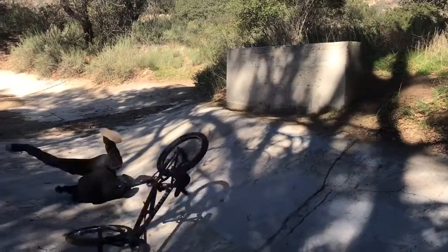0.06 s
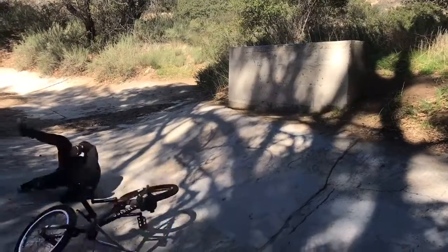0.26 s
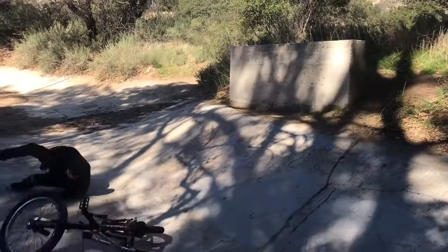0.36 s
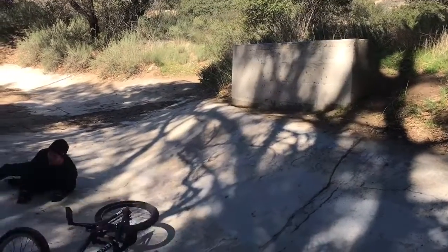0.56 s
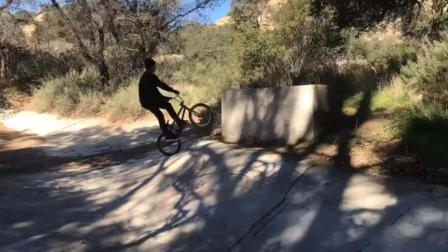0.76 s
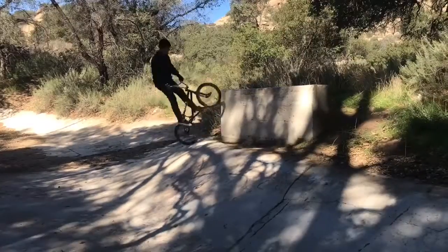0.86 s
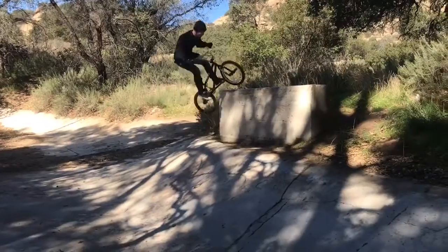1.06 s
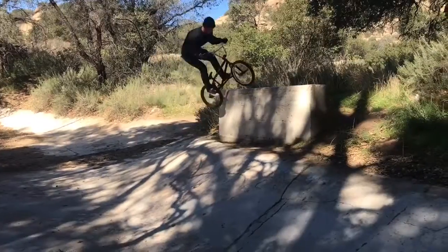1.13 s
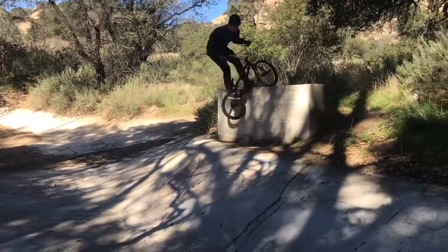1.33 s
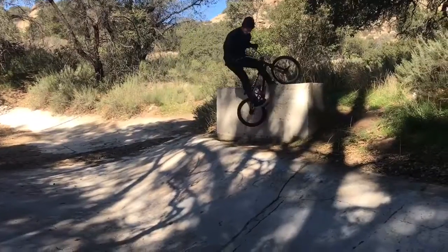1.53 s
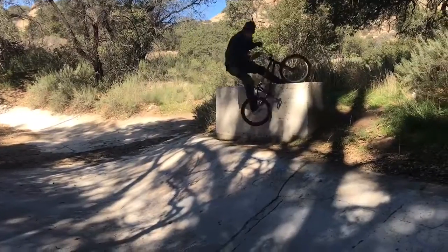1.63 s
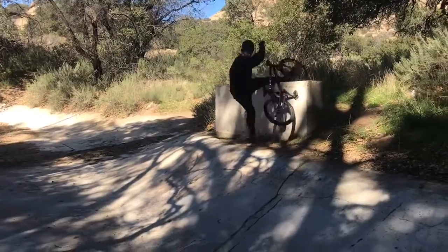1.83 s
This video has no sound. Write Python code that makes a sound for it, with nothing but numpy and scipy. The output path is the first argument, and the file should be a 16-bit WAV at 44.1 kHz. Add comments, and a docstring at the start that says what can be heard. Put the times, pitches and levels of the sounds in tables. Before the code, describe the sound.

A bicycle crash on concrete, heard close: gritty sliding and chinking steel, a cluster of metal knocks and dull tyre thumps at 0.2-0.35 seconds, heavier bangs at 0.55 and 0.8. At 0.85 it cuts to quiet outdoor air with a low wavering drone, brief tyre hiss and faint rapid freewheel clicks. From 1.38 the bike hits a block farther away, scraping and clattering until about 1.9, with short echo.

```python
"""Grit scrapes close by as a trick bicycle slides on concrete, its small steel parts chinking.
Metal knocks (noise crunches over ringing frame modes), sine thumps of the tyres and gritty scuffs follow, with echo.
The scene cuts to a second try: tyre hiss dies away and the freewheel clicks in mid-air over soft air noise
and a wavering low drone, then the bike strikes a concrete block and clatters down its face."""
import sys
import numpy as np
from scipy import signal
from scipy.fft import rfft, irfft, next_fast_len
from scipy.io import wavfile
from scipy.ndimage import map_coordinates

SR = 44100
rng = np.random.default_rng(int(sys.argv[2]) if len(sys.argv) > 2 else 0)


def materialize(psi):
    """Save the field psi as 16-bit PCM at rate SR to the path in sys.argv[1].

    A 1-D psi becomes a single channel; in a 2-D psi each row is a channel.
    """
    bounded = np.clip(np.atleast_2d(psi).T, -1, 1)
    quanta = np.round(bounded * 32767).astype(np.int16)
    wavfile.write(sys.argv[1], SR, quanta)


N = 83790

CUT_S = 0.848  # the near crash gives way to the far one
ATTACK_S = 0.0013  # rise of knocks, chinks and freewheel clicks
# tone of rubber and pedals rubbing on concrete: pitch_hz, level_db
SCUFF_TONE = [(100, -27), (290, -2), (480, -6), (800, 1), (1300, -3), (2200, -2.5), (3800, -6), (5000, -13),
              (8000, -12), (16000, -24)]


def amp(db):
    """Decibels to gain."""
    return 10 ** (np.asarray(db) / 20)


def unit(x):
    """Scale to rms 1."""
    return x / np.sqrt(np.mean(x ** 2) + 1e-20)


def blow(x):
    """Scale a hit to the energy of 12 ms at rms 1."""
    return x / np.sqrt(np.sum(x ** 2) / (0.012 * SR) + 1e-20)


def clock():
    """Seconds at each sample."""
    return np.arange(N) / SR


def along(points, hz):
    """Read (Hz, value) points on a log frequency axis."""
    f, v = np.transpose(points)
    return np.interp(np.log(hz + 1), np.log(f + 1), v)


def curves(rows):
    """Draw one value per sample for each column after the time."""
    s, *cols = np.transpose(rows)
    return [np.interp(clock(), s, c) for c in cols]


def wobble(rate):
    """A smooth random curve with rate knots a second."""
    return map_coordinates(rng.standard_normal(N // 20), [clock() * rate], mode="wrap")


def decay(t, t60):
    """Full level until t = 0, then an exponential fall of 60 dB in t60 seconds."""
    return np.exp(-np.log(1000) * np.maximum(t, 0) / t60)


def coloured(x, gain):
    """Filter x with a gain that depends on frequency."""
    size = next_fast_len(len(x) + 4096)
    return irfft(rfft(x, size) * gain(np.fft.rfftfreq(size, 1 / SR)), size)[:len(x)]


def add(track, s, x):
    """Mix x into the track at time s."""
    part = track[max(round(s * SR), 0):][:len(x)]
    part += x[:len(part)]


def ring(modes, t):
    """Sum damped sine modes, with random phases and about 2 dB of level scatter at each strike."""
    out = np.zeros(len(t))
    for hz, db, t60 in modes:
        level = amp(db + rng.normal(0, 2))
        out += level * decay(t, t60) * np.sin(2 * np.pi * (hz * t + rng.random()))
    return out


def grit():
    """Friction on concrete: tiny random impacts mixed with hiss, juddering together in level."""
    grains_per_s, grain_db, spread_db, judder_db = 1400, -4.5, 5.5, 2.84
    sizes = amp(spread_db * np.minimum(rng.exponential(size=N), 3))
    grains = (rng.random(N) < grains_per_s / SR) * rng.choice([-1, 1], N) * sizes
    rough = rng.standard_normal(N) + amp(grain_db) * unit(grains)
    return unit(rough * amp(judder_db * wobble(130)))


def scrape(levels, tone):
    """Long friction: filtered grit under a level curve."""
    return amp(curves(levels)[0]) * unit(coloured(grit(), lambda hz: amp(along(tone, hz))))


def slide():
    """The bike slides on concrete: filtered grit of one fixed tone that rises and falls in loudness."""
    # loudness of the slide: time_s, level_db
    slide_levels = [(0, -33), (.13, -37), (.19, -39), (.22, -33.5), (.25, -30), (.31, -32.5), (.38, -31.5),
                    (.52, -36), (.6, -28), (.68, -37.5), (.85, -27.5)]
    # tone of the slide: pitch_hz, level_db
    slide_tone = [(29, -59), (50, -8.5), (87, -5.5), (158, -11.5), (221, -6.5), (256, -12.5), (341, -15),
                  (404, -20), (466, -18.5), (829, -8), (1830, -19.5), (2330, -17), (4780, -21.5),
                  (7540, -24), (15500, -31.5)]
    return scrape(slide_levels, slide_tone)


def chinks():
    """Chain and spokes chink: a high-passed noise tick plus the short ring of small steel parts."""
    # each chink: start_s, level_db (before the 5 dB trim below)
    chink_hits = [(0.0304, -34), (.1112, -35), (.124, -33.5), (0.203, -33), (0.213, -39), (0.391, -40),
                  (0.4529, -34.5), (0.482, -33.5), (0.625, -33), (0.691, -37), (0.721, -36.5)]
    # ringing modes of the steel parts: pitch_hz, level_db, t60_s
    steel_modes = [(5880, 2.5, 0.035), (7300, 10, 0.02), (7900, -3.5, .06), (9240, 3, 0.026),
                   (13000, -4.5, .03)]
    tick_t60_s, ring_db, trim_db = 0.012, -1.5, -5
    out, t = np.zeros(N), clock()[:SR // 8]
    rise = np.minimum(t / ATTACK_S, 1)
    high_pass = signal.butter(2, 3500, "high", fs=SR, output="sos")
    for s, db in chink_hits:
        tick = signal.sosfilt(high_pass, rng.standard_normal(len(t))) * decay(t, tick_t60_s)
        chink = blow(tick) + amp(ring_db) * blow(ring(steel_modes, t))
        add(out, s, amp(db + trim_db) * blow(chink * rise))
    return out


def tyres():
    """Soft sine thumps of the tyres, and the long note of the air ringing inside one."""
    # each thump: start_s, pitch_hz, peak_db, t60_s
    tyre_thumps = [(0.221, 322.6, -12.5, 0.046), (.24, 185, -27, 0.18), (0.299, 117, -19, 0.11),
                   (0.3234, 146, -7, 0.029), (0.556, 187, -9.5, 0.042), (0.561, 100, -13.5, 0.074),
                   (0.728, 92.9, -29.5, 0.11), (.762, 213, -21.5, 0.11), (1.387, 139, -30.5, 0.085),
                   (1.512, 144, -36.5, 0.19), (1.632, 118, -28, 0.12)]
    # each ring of the air in the tyre: start_s, level_db
    air_rings = [(.228, -29), (0.557, -34)]
    ring_hz, ring_t60_s = 226.5, 1
    out, t = np.zeros(N), clock()
    for s, hz, db, t60 in tyre_thumps:
        add(out, s, amp(db) * np.sin(2 * np.pi * hz * t) * decay(t, t60) * np.minimum(t / 0.002, 1))
    for s, db in air_rings:
        level = amp(db + 0.5 * wobble(24.5))
        add(out, s, level * np.sin(2 * np.pi * ring_hz * t) * decay(t, ring_t60_s))
    return out


def knocks():
    """Metal crunches into concrete: the part that strikes clanks and the whole frame rings with it."""
    # each knock: start_s, contact_s, crunch_t60_s, clank_hz,
    # clank_db, body_db, middle_db, crack_db, treble_db
    knock_hits = [(0.2259, .005, 0.085, 880, -29, -35, -33, -26, -28.5),
                  (0.2705, 0.0013, 0.013, 6230, -37, -26, -52, -41, -30.5),
                  (0.2991, 0.0011, 0.014, 1070, -27.5, -37, -29, -24.5, -56),
                  (0.3201, 0.0056, 0.009, 3520, -19, -30.5, -24, -16, -26.5),
                  (0.5549, 0.0029, 0.06, 924, -15, -25, -14, -13.5, -18),
                  (0.8054, 0.0045, 0.066, 1887, -13, -20, -15, -15.5, -23.5),
                  (1.3838, 0.0022, 0.024, 1380, -21.5, -37.5, -23, -25.5, -32.5),
                  (1.4312, 0.0026, .03, 1250, -32.5, -45, -30.5, -55, -50),
                  (1.4641, .003, 0.012, 1010, -35.5, -59, -35.5, -41, -40.5),
                  (1.4932, .008, .05, 1200, -27, -33.5, -25, -25, -34.5),
                  (1.6267, 0.0044, 0.013, 3110, -26.5, -30.5, -21.5, -20.5, -24),
                  (1.6708, 0.0018, .015, 2135, -35, -43, -40, -49, -43),
                  (1.746, .004, 0.093, 1877, -36, -42.5, -29, -27, -36.5)]
    # body, middle, crack and treble bands: low_hz, high_hz
    band_edges = [(170, 450), (600, 1500), (1500, 4100), (4100, 16000)]
    # modes of frame, bars and rims: pitch_hz, level_db, t60_s (each knock damps them further)
    frame_modes = [(205.5, 6.5, .08), (344, 0.5, 0.1), (646.5, -1, 0.091), (787, -0.5, 0.042),
                   (860, -6, 0.084), (1173, -3, 0.044), (1297, -1, 0.058), (1897, -1.5, 0.064),
                   (2169, -0.5, 0.031), (2685, 0, 0.048), (3345, -11, 0.019), (3930, -11.5, .05),
                   (4480, -28, 0.067), (6200, 1, 0.04)]
    # partials of the clank: multiple of the clank pitch, level_db
    clank_partials = [(1.001, 3), (1.9, -10)]
    clank_t60_s = 0.02  # averaged with the t60 of the crunch
    waver_rad = 0.73  # phase unrest of the clank
    ring_gain = 2 * amp(-0.5)  # frame modes over the crunch
    out, t = np.zeros(N), clock()[:SR // 4]
    bands = [signal.butter(3, edges, "band", fs=SR, output="sos") for edges in band_edges]
    rise = np.minimum(t / ATTACK_S, 1)
    for s, contact, t60, clank_hz, clank_db, *levels in knock_hits:
        crunch = rng.standard_normal(len(t)) * decay(t - contact, t60)
        modes = ring(frame_modes, t) * decay(t, 4 * t60)
        clank = np.zeros(len(t))
        for multiple, db in clank_partials:
            phase = 2 * np.pi * multiple * clank_hz * t + waver_rad * wobble(690)[:len(t)]
            clank += amp(db) * np.sin(phase)
        clank *= decay(t - contact / 2, (clank_t60_s + t60) / 2)
        add(out, s, amp(clank_db) * blow(rise * clank))
        for band, db in zip(bands, levels):
            rough, clean = signal.sosfilt(band, rise * np.array([blow(crunch), blow(modes)]))
            add(out, s, amp(db) * blow(blow(rough) + ring_gain * clean))
    return out


def scuffs():
    """Pegs and pedals scuff the concrete: brief strokes of grit, each with its own brightness."""
    # each scuff: start_s, length_s, level_db, treble_tilt_db_per_octave
    scuff_strokes = [(0.24, 0.039, -32, 0), (.356, 0.016, -30, 0), (0.7611, 0.014, -24.5, -1.5),
                     (0.785, 0.038, -29.5, -1.5), (.874, 0.017, -54, 1), (1.374, .01, -40, 2.5),
                     (1.437, .006, -31.5, 1), (1.452, .02, -30, -3), (1.522, 0.0232, -36.5, -0.5),
                     (1.598, 0.0217, -36.5, 0), (1.638, 0.015, -26, -1.5), (1.805, 0.012, -34, -0.5),
                     (1.838, 0.0067, -38.5, -2), (1.888, .02, -38, 0.5)]
    rise_s, t60_s, tilt_from_hz = 0.0018, 0.053, 470
    out, t = np.zeros(N), clock()[:SR // 6]
    for s, length, db, tilt_db in scuff_strokes:
        def tone(hz):
            """The shared scuff tone, tilted in the treble."""
            octaves = np.log2(np.maximum(hz / tilt_from_hz, 1))
            return amp(along(SCUFF_TONE, hz) + tilt_db * octaves)
        stroke = unit(coloured(grit()[:len(t)], tone))
        add(out, s, amp(db) * stroke * np.minimum(t / rise_s, 1) * decay(t - length, t60_s))
    return out


def banks(x):
    """Concrete banks scatter an echo: a noise tail, 7 ms late, that dies at its own pace in each band."""
    # decay of the echo: pitch_hz, t60_s
    echo_decay = [(100, .15), (900, 0.39), (3000, 0.3), (14000, 0.28)]
    hz, t, z = signal.stft(rng.standard_normal(SR // 2), SR, nperseg=256)
    tail = signal.istft(z * decay(t, along(echo_decay, hz)[:, None]), SR, nperseg=256)[1]
    late = np.pad(x, (round(0.007 * SR), 0))
    return signal.fftconvolve(late, tail / np.linalg.norm(tail))[:N]


def outdoor_air():
    """Soft outdoor background: steady noise weighted to the bass."""
    # tone of the background: pitch_hz, level_db
    air_tone = [(25, -30), (45, -10), (75, 0), (125, -8), (250, -14), (450, -20), (750, -19), (1400, -28),
                (2100, -35), (4000, -40), (7000, -49), (15000, -53)]
    return amp(-46.5) * unit(coloured(rng.standard_normal(N), lambda hz: amp(along(air_tone, hz))))


def drone():
    """A low outdoor drone: one sine that wavers in phase and level."""
    # loudness of the drone: time_s, level_db
    drone_levels = [(.85, -38), (.95, -40.5), (1.1, -45.5), (1.2, -40), (1.9, -39)]
    drone_hz = 57.3
    tone = np.sqrt(2) * np.sin(2 * np.pi * drone_hz * clock() + 0.25 * wobble(8.6))
    return amp(curves(drone_levels)[0] + 1.1 * wobble(15.1)) * tone


def roll():
    """Tyre hiss, made of filtered grit, dies away as the tyres leave the ramp."""
    # loudness of the hiss: time_s, level_db
    roll_levels = [(.85, -48), (.89, -47), (.95, -56.5), (1.01, -64), (1.07, -89), (1.15, -100)]
    # tone of the hiss: pitch_hz, level_db
    roll_tone = [(100, -4), (280, -2), (600, 3), (1200, -5.5), (2200, 1), (3800, -9), (6000, -14),
                 (16000, -23)]
    return scrape(roll_levels, roll_tone)


def freewheel():
    """Ratchet pawls click as noise bursts, a little unevenly, at the speed of the spinning rear wheel."""
    # the ratchet speeds up and slows in mid-air: time_s, clicks_per_s, level_db
    ratchet = [(1.0, 40, -92), (1.07, 50, -66), (1.13, 70, -64), (1.21, 102, -62), (1.28, 105, -62),
               (1.37, 82, -61), (1.45, 89, -68.5)]
    # tone of the clicks: pitch_hz, level_db
    pawl_tone = [(1200, -37), (2600, -17), (4100, 7.5), (5200, -6), (8000, -2.5), (11000, -8),
                 (16000, -8.5)]
    t60_s, scatter_db, jitter = 0.015, 0.5, 0.05  # jitter is a fraction of the click rate
    rate, db = curves(ratchet)
    turns = np.cumsum(rate * (1 + jitter * wobble(59))) / SR  # counted in clicks
    since_click = turns % 1 / rate  # seconds
    rise = np.minimum(since_click / ATTACK_S, 1)
    clicks = rng.standard_normal(N) * decay(since_click, t60_s) * rise
    level = amp(db + scatter_db * wobble(100))
    return level * unit(coloured(clicks, lambda hz: amp(along(pawl_tone, hz))))


def drag():
    """Tyres and shoes drag down the block: grit with the tone of the scuffs."""
    # loudness of the drag: time_s, level_db
    drag_levels = [(1.37, -62.5), (1.40, -31), (1.48, -55.5), (1.52, -36), (1.58, -38.5), (1.68, -38),
                   (1.73, -46), (1.8, -44.5), (1.87, -52.5)]
    return scrape(drag_levels, SCUFF_TONE)


def scene():
    """The near crash fades out and the far one fades in, both with an echo."""
    fade_out_s, fade_in_s, lead_s = 0.034, 0.042, 0.0039  # the far side starts lead_s before the cut
    near_echo_db, far_echo_db = -16.5, -12.5
    t = clock()
    hits = chinks() + tyres() + knocks() + scuffs()
    # ringing tails that outlast the cut pass into the second part
    first, second = hits * (t < CUT_S), hits * (t >= CUT_S)
    near = slide() + first + amp(near_echo_db) * banks(first)
    far = outdoor_air() + drone() + roll() + freewheel() + drag()
    far += second + amp(far_echo_db) * banks(second)
    fade_out = np.clip((CUT_S - t) / fade_out_s, 0, 1)
    fade_in = np.clip((t - CUT_S + lead_s) / fade_in_s, 0, 1)
    return (near * fade_out + far * fade_in)[None]


def record(dry):
    """The microphone sheds the deepest bass, rounds off the loudest peaks and passes nothing above its top."""
    low_cut_hz, top_hz, ceiling = 37, 15900, 1.0
    thin = signal.sosfilt(signal.butter(3, low_cut_hz, "high", fs=SR, output="sos"), dry[0])
    rounded = thin / (1 + np.abs(thin / ceiling) ** 6) ** (1 / 6)
    return coloured(rounded, lambda hz: hz < top_hz)[None]


dry = scene()
out = record(dry)
materialize(out)
```